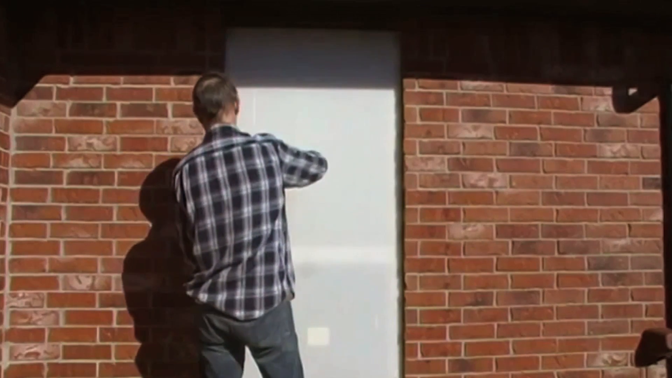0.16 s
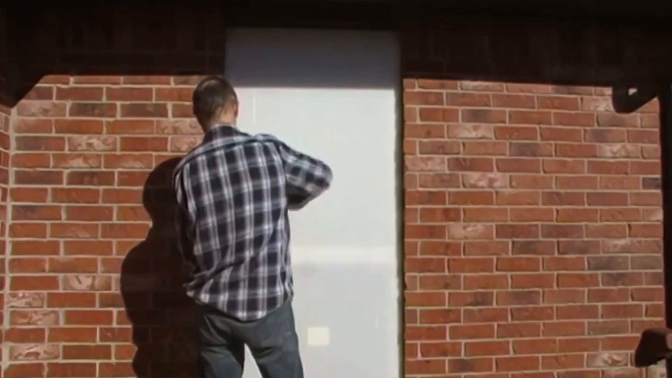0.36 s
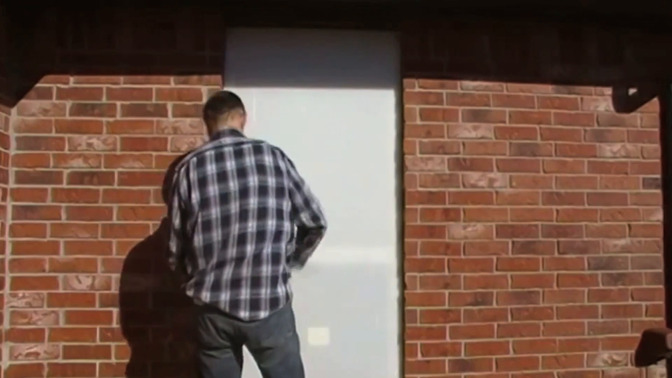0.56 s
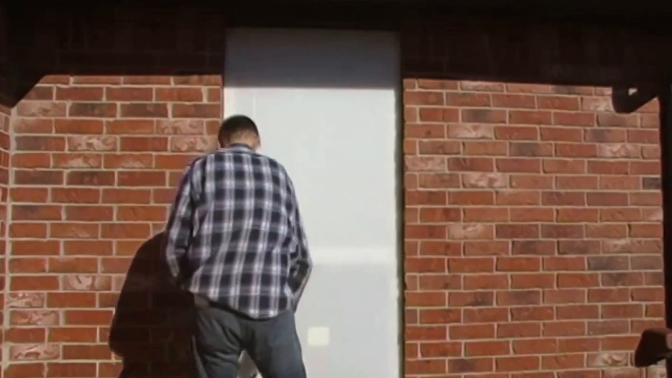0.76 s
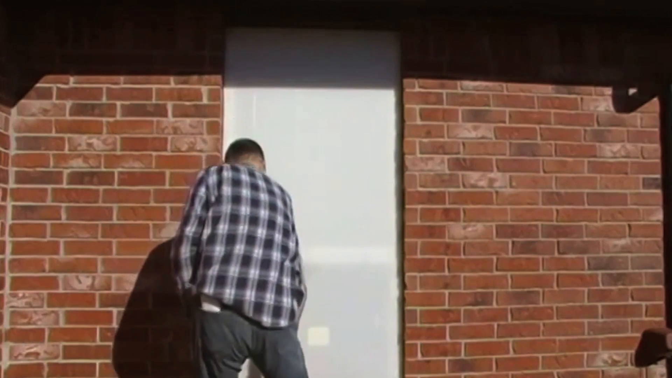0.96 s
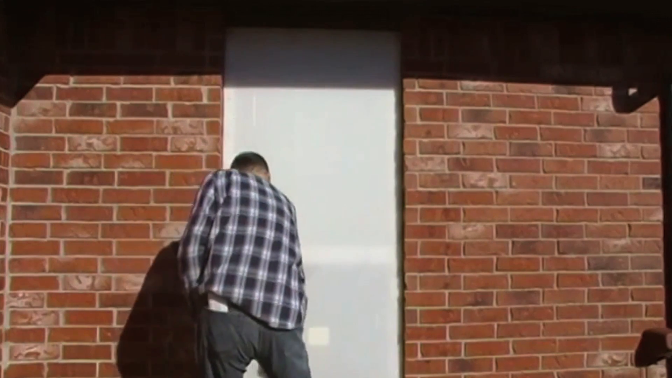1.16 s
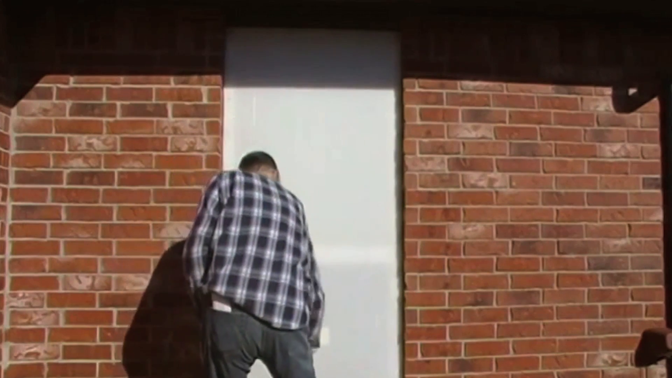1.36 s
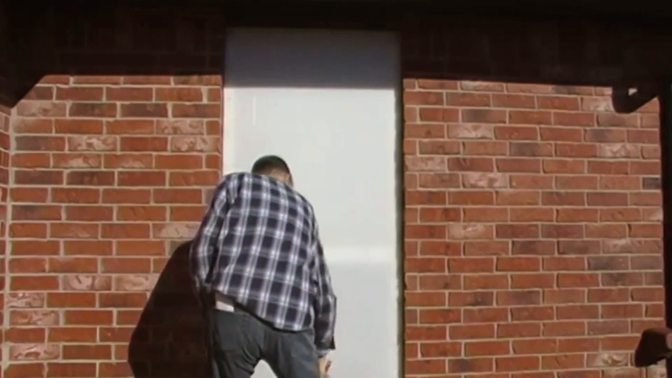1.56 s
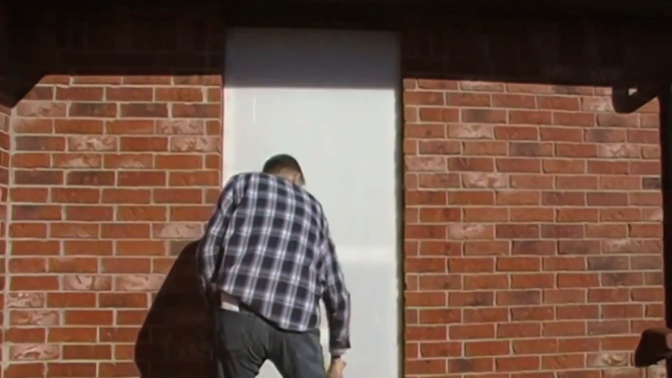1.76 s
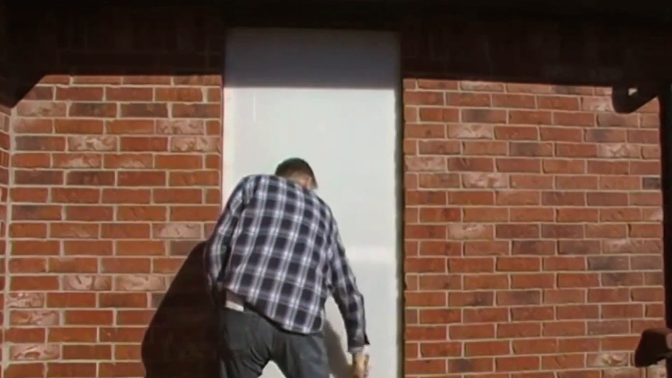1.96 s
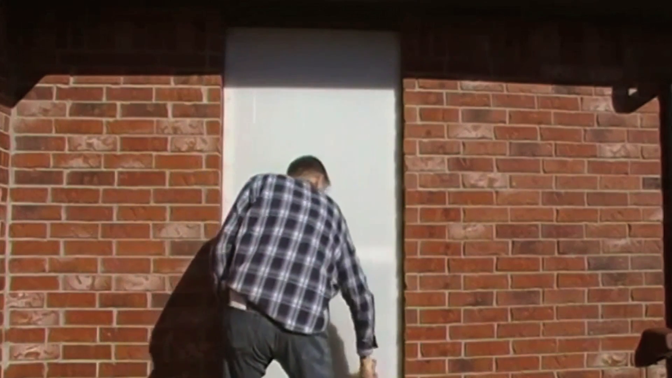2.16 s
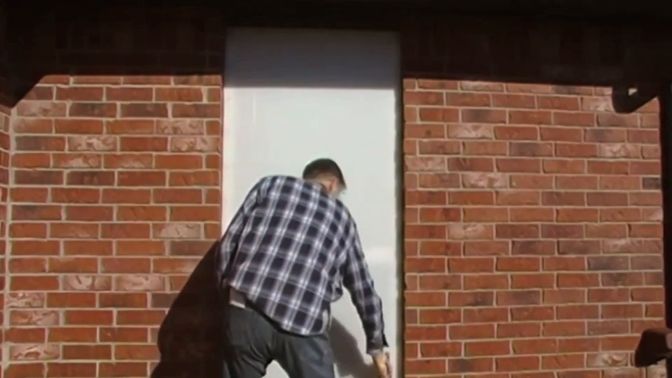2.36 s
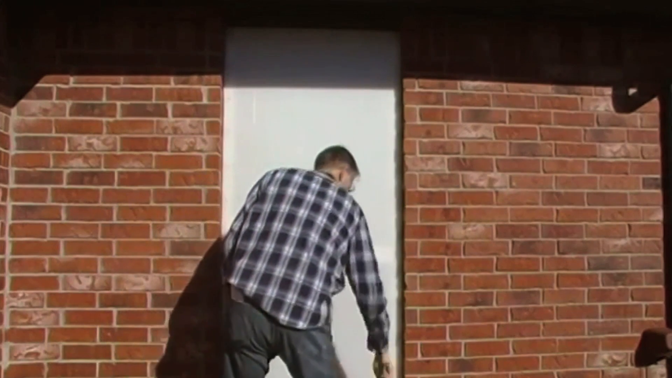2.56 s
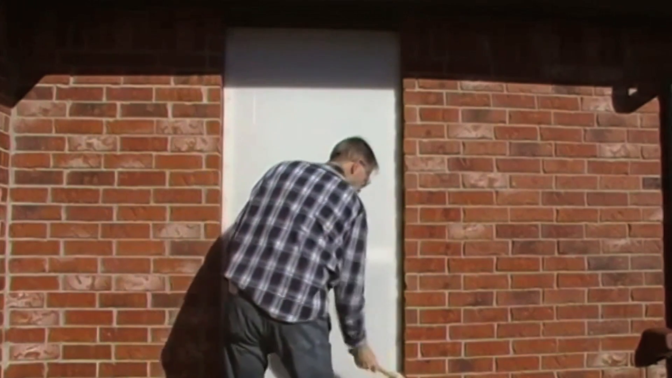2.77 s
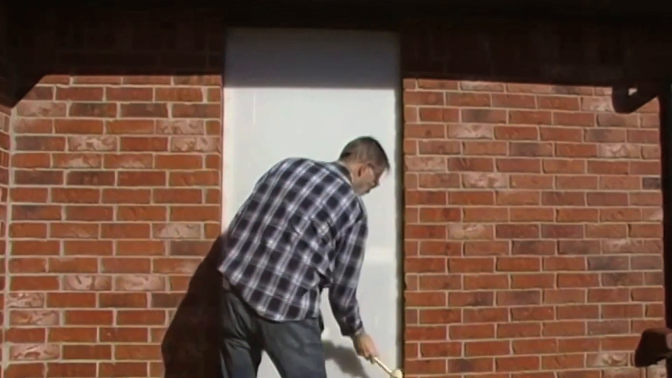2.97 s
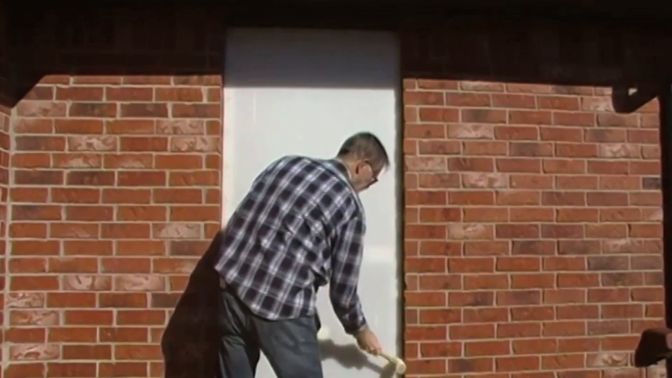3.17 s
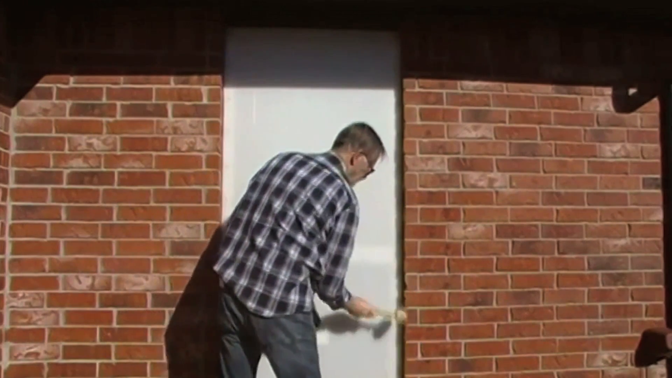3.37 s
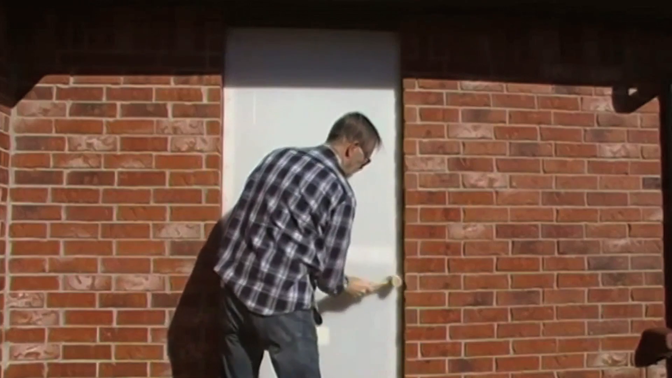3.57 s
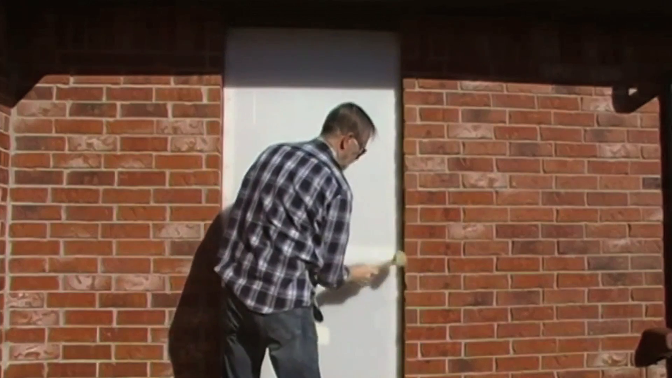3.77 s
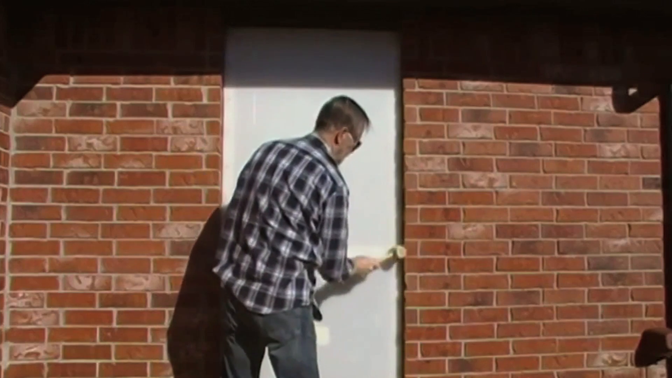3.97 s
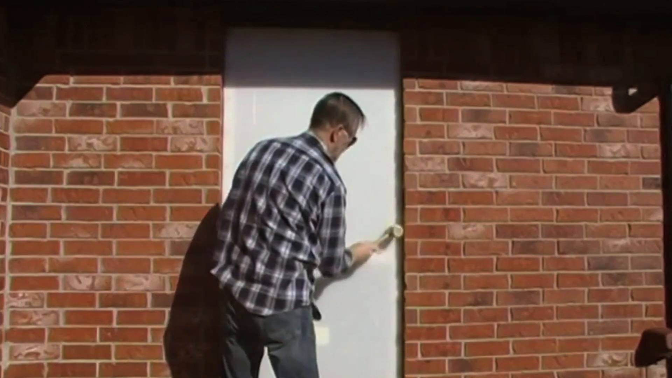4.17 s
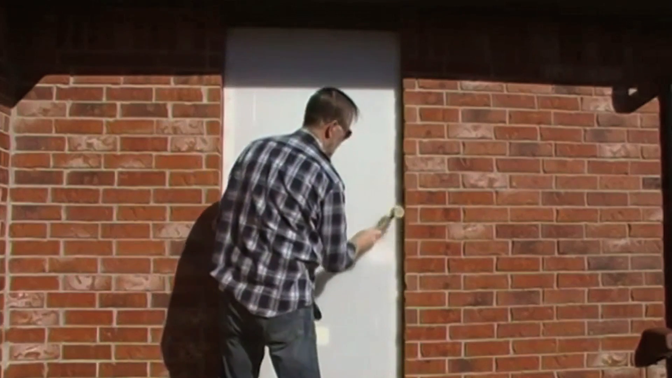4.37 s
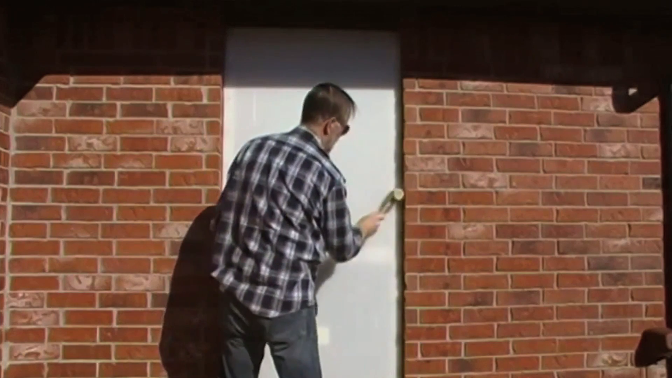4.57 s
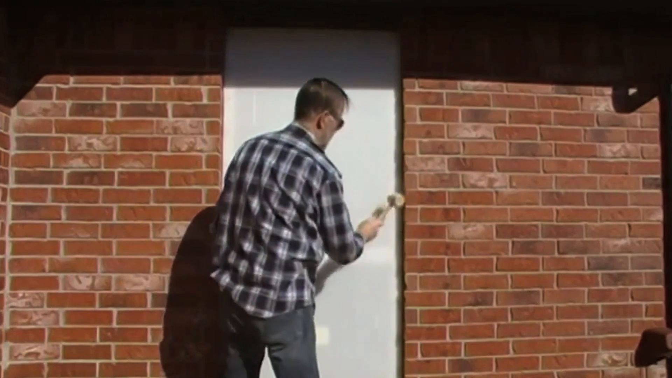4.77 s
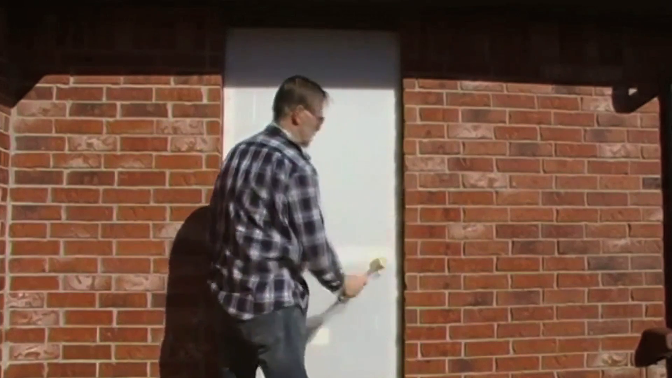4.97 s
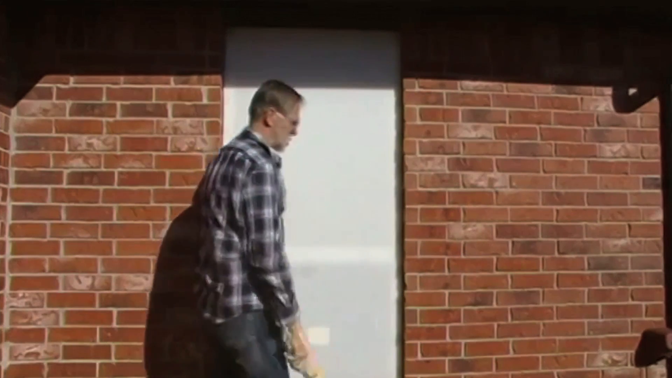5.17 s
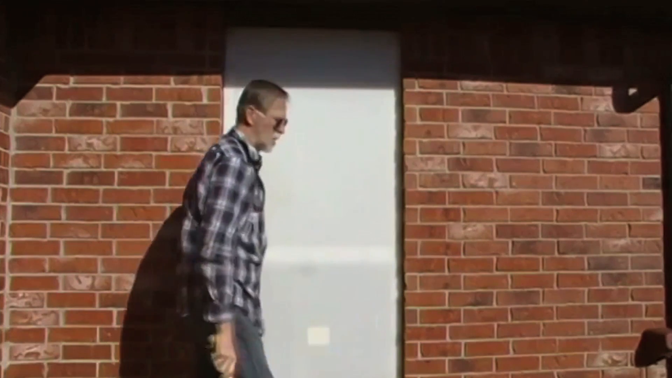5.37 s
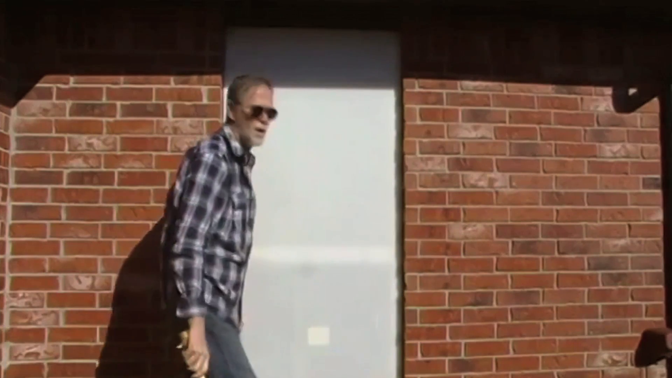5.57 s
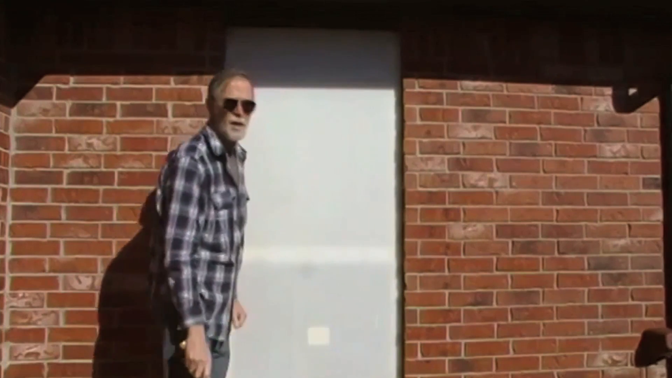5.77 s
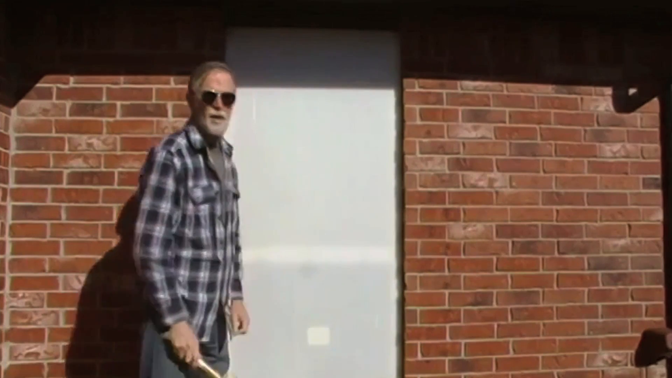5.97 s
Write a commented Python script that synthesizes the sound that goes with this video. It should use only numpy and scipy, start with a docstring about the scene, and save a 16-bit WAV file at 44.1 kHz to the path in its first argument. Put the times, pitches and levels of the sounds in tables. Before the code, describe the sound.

Loud mallet blows knock a light sheet panel into its frame outdoors, each booming, rattling and distorting, with faint cloth rustle after the last hits.

```python
"""Window panel tapped into its frame

A mallet taps a light storm window panel into its frame, working along the edge.
Each blow knocks the edge (swinging tone, noise band), sets the sheet booming (decaying modes, noise bands)
and makes it chatter in the frame (gated noise), overloading the microphone (hard clipping).
Between the blows: small frame ticks, rustling clothes, low outdoor rumble, faint far tones, hiss and whine."""
import sys
import numpy as np
from scipy import signal
from scipy.fft import rfft, irfft, next_fast_len
from scipy.io import wavfile

SR = 44100
rng = np.random.default_rng(int(sys.argv[2]) if len(sys.argv) > 2 else 0)


def unload_audio(sound):
    """Save the sound as a 16-bit wav file, at the path given as the first command line argument."""
    columns = np.transpose(np.atleast_2d(sound))
    # keep every value between -1 and 1, then stretch to whole-number steps
    steps = np.round(np.clip(columns, -1, 1) * 32767)
    wavfile.write(sys.argv[1], SR, steps.astype(np.int16))


N = 266034
TIME_S = np.arange(N) / SR
AGE_S = np.arange(int(.72 * SR)) / SR  # time since the onset of one sound
BAND_HZ = 30 * 2 ** (np.arange(18) / 2)  # half-octave steps

# mallet blows: (time [s], force [dB], height up the edge [m], knock pitch [Hz], then relative to the force:
# knock [dB], second knock [dB], crack [dB], rattle [dB], slap [dB])
BLOWS = [(-.115, -1, 1.3, 845, 8, -11, -9, -17, -10.5), (0.2642, -0.5, 0.95, 382, -1, -0.5, -2, -14.5, -23),
         (1.2834, 1, .25, 303.8, 7, 2, -22, -22, -12), (1.6668, -2.5, .15, 312, 3.5, 3, -4, -38, -20.5),
         (2.0646, -1.5, 0.16, 272.6, 2.5, -7, -3.5, -38, -17.5),
         (2.427, -26.5, .2, 236.4, 21, -5, -10.5, -28, -27),
         (2.4809, -2, 0.22, 237.3, 7.5, -6.5, -5.5, -26.5, -18),
         (3.216, 0.5, .36, 222.5, 1, -22, 2.5, -14, -12),
         (3.6804, -1.5, 0.78, 509, -0.5, -13, 0.5, -9.5, -41),
         (4.017, -1.5, 0.86, 769, 2.5, -5, -4.5, -8, -11.5), (4.3652, -1.5, 1.0, 706, -3, 1, 1, -8.5, -25),
         (4.7012, -2.5, 1.32, 785.5, 6.5, 6.5, -3.5, -8.5, -15)]
# two strong low drum modes of the panel, their levels varying with height and by blow:
# (frequency [Hz], relative level [dB], t60 [s])
DRUM_MODES = [(80.97, -2, 0.55), (163.7, -4.5, 0.52)]
# other panel modes, some short and some long: (frequency [Hz], relative level [dB], t60 [s])
PANEL_MODES = [(67, -2, 0.42), (96.8, -8.5, 0.66), (127.5, -3.5, 0.44), (204, -2, 0.5), (239.8, 1, 0.4),
               (273, 0, 0.24), (336.4, 1.5, 0.47), (398.7, -8, 0.56), (429, -9.5, 0.46), (504, -16, 0.64),
               (526, 1, 0.25), (610, -1, 0.27), (790, -6, 0.34), (897, -9, 0.38), (989, -17.5, 0.5),
               (1087, -6.5, 0.34), (1173, -10, 0.43), (1230, -33, 0.92), (1570, -34, 0.23),
               (1680, -12, 0.17), (1837, -23, 0.7), (2120, -11, 0.22), (3230, -33, 0.87), (4130, -31, 0.14)]
# crowded bending waves of the sheet: (frequency [Hz], relative level before tilt [dB per octave band], t60 [s])
SHEET_BANDS = [(30, -21.5, 0.81), (70.5, -20, 0.15), (138, -10.5, 0.43), (250, -8.5, 0.45), (520, -1, 0.32),
               (1040, -5.5, 0.3), (2030, -13.5, 0.41), (3830, -18, 0.36), (5370, -21, 0.31),
               (10100, -24.5, 0.22)]
# hard contact of panel and frame: (frequency [Hz], relative level [dB per octave band])
CONTACT_SPECTRUM = [(300, -19), (900, 1.5), (2000, -4.5), (4000, -1.5), (6000, -12.5), (10500, -10.5)]
# small ticks of the frame: (time [s], level [dB], centre [Hz], t60 [s])
FRAME_TICKS = [(1.504, -32, 2200, 0.032), (1.506, -26.5, 2000, 0.03), (2.835, -36, 3880, .042),
               (5.379, -35, 1360, 0.087), (5.405, -40, 1210, 0.46)]
# arm and body movements: (middle [s], half-width to -17 dB [s], relative level [dB])
MOVES = [(.22, 0.34, -51), (0.533, 0.11, -47), (5.017, 0.4, -47.5), (5.333, 0.23, -55.5),
         (5.593, 0.19, -47), (6.03, 0.14, -48)]
# sliding cloth: (frequency [Hz], relative level [dB per octave band])
CLOTH_SPECTRUM = [(500, -10.5), (1500, -8.5), (4000, -4.5), (7000, -7), (11000, -2.5)]
# low outdoor rumble: (frequency [Hz], level [dB per octave band])
RUMBLE_SPECTRUM = [(25, -59), (55, -44.5), (105, -40.5), (180, -47.5), (350, -55.5), (1000, -70)]
# distant hum and hiss of the neighbourhood: (frequency [Hz], level before AIR_DB [dB per octave band])
AIR_SPECTRUM = [(200, -60.5), (350, -52.5), (700, -56.5), (1500, -61), (4000, -66.5), (10500, -73)]
# faint tones from far away: (start [s], length [s], mid-tone pitch [Hz], peak level [dB])
FAR_TONES = [(0.731, 0.073, 1565, -57), (0.729, 0.12, 1800, -56), (0.785, 0.057, 880, -49.5),
             (1.15, 0.29, 793, -47.5), (1.18, 0.075, 1630, -56), (3.03, 0.14, 790, -48.5)]
# microphone hiss: (frequency [Hz], level [dB per octave band])
HISS_SPECTRUM = [(500, -71), (2000, -66), (5000, -62), (10500, -62)]
# thin electrical whine: (frequency [Hz], level [dB])
WHINE = (7900, -73)

# edge and sheet, relative to the force
SWING_DB, SHEET_DB = 0.5, -2
SHEET_TILT_DB_PER_OCTAVE, TILT_PER_FORCE_DB = 0.69, 0.27
# the second knock lies this share of the way, in octaves, to the pitch that the sheet favours
FAVOURED_HZ, FAVOURED_SHARE = 589, .62
# higher up the edge the panel is looser: stronger drum modes, lower rattle, later slap
BOOM_DB, BOOM_DB_PER_M = -11.5, -0.5
DRUM_DB, DRUM_DB_PER_M, DRUM_SCATTER_DB = np.array([-1.5, -0.5]), 4, 3.55
RATTLE_HZ, RATTLE_OCTAVES_PER_M, RATTLE_OCTAVES, RATTLE_TOP_HZ = 3850, -1.51, 1.2, 5000
SLAP_S, SLAP_S_PER_M = .026, .007
# one slow sway of the panel; its ticking weakens with height
SWAY_S, CHATTER_DB_PER_M = .04, -2
AIR_DB = 1
MIC_TOP_HZ, TOP_HZ = 11400, 16200


def undb(db):
    """Decibels to gain."""
    return 10 ** (np.asarray(db) / 20)


def fade(t60_s):
    """Free exponential decay, 60 dB in t60_s."""
    return np.exp(-np.log(1000) * AGE_S / t60_s)


def swell_in(build_s):
    """Exponential build-up."""
    return 1 - np.exp(-AGE_S / build_s)


def at_hz(table, hz):
    """Columns of a spectrum table, interpolated over log frequency."""
    table_hz, *columns = np.transpose(table)
    return [np.interp(np.log(hz), np.log(table_hz), column) for column in columns]


def add(out, start_s, sound):
    """Mix a sound in at start_s, cut to the length of the scene."""
    start = int(round(start_s * SR))
    a, b = max(start, 0), min(start + sound.shape[-1], N)
    out[:, a:b] += sound[..., a - start:b - start]


def walk(rate_hz):
    """Slow random curve: normal knots joined by straight lines."""
    knots = rng.standard_normal(int(N / SR * rate_hz) + 2)
    return np.interp(TIME_S * rate_hz, np.arange(len(knots)), knots)


def noise(hz, octaves, size, apart_hz=3500, widest=0.96):
    """Stereo noise band of rms 1; short waves differ more between the channels."""
    n = next_fast_len(size, real=True)
    f = np.arange(1, n // 2) * SR / n
    shape = np.exp(-2 * (np.log2(f / hz) / octaves) ** 2)
    phase = 2 * np.pi * rng.random((2, len(f)), dtype=np.float32)
    spectrum = np.zeros((2, n // 2 + 1), np.complex64)
    spectrum[:, 1:n // 2] = shape * (np.cos(phase) + 1j * np.sin(phase))
    mid, side = irfft(spectrum, n)[:, :size]
    side = side * min(hz / apart_hz, widest)
    pair = np.array([mid + side, mid - side])
    return pair / pair.std()


def coloured(table, size, apart_hz=3200, widest=0.9):
    """Stereo noise; the table sets the octave-band levels of its mid signal."""
    n = next_fast_len(size, real=True)
    f = np.maximum(np.fft.rfftfreq(n, 1 / SR), 1)
    low_cut = np.minimum(f / table[0][0], 1) ** 2
    per_octave = np.sqrt(SR / (2 * np.log(2) * f))  # white noise to equal power per octave
    gain = undb(at_hz(table, f)[0]) * low_cut * per_octave
    mid, side = rfft(rng.standard_normal((2, n))) * gain
    side = side * np.minimum(f / apart_hz, widest)
    return irfft(np.array([mid + side, mid - side]), n)[:, :size]


def mallet():
    """Every blow, then the slap of the returning panel and the echo; all scale with the force."""
    out = np.zeros((2, N))
    for s, force_db, height_m, *contact, slap_db in BLOWS:
        force = undb(force_db)
        add(out, s, force * blow(force_db, height_m, *contact))
        after = undb(slap_db) * slap() + yard()
        add(out, s + SLAP_S + SLAP_S_PER_M * height_m, force * after)
    return out


def blow(force_db, height_m, hz, knock_db, second_db, crack_db, rattle_db):
    """Panel's answer to one blow: the edge swings and knocks, the sheet cracks, rattles, booms and chatters."""
    second_hz = hz * (FAVOURED_HZ / hz) ** FAVOURED_SHARE
    edge = undb(SWING_DB) * swing(hz) + undb(knock_db) * knock(hz) + undb(second_db) * knock(second_hz)
    waves = undb(SHEET_DB) * sheet(SHEET_TILT_DB_PER_OCTAVE + TILT_PER_FORCE_DB * force_db)
    rattle_hz = RATTLE_HZ * 2 ** (RATTLE_OCTAVES_PER_M * height_m)
    buzz = undb(rattle_db) * rattle(rattle_hz, RATTLE_OCTAVES)
    short_waves = clustered(undb(crack_db) * crack() + waves + buzz)
    drum_db = DRUM_DB + DRUM_DB_PER_M * height_m + DRUM_SCATTER_DB * rng.standard_normal(2)
    body = undb(BOOM_DB + BOOM_DB_PER_M * height_m) * boom(drum_db)
    return edge + short_waves + body + undb(CHATTER_DB_PER_M * height_m) * chatter()


def swing(hz, direct_db=10, direct_t60_s=0.023):
    """The edge gives way under the mallet and swings for a few cycles."""
    return -undb(direct_db) * np.sin(2 * np.pi * hz * AGE_S) * fade(direct_t60_s)


def knock(hz, return_db=-9, return_t60_s=0.3, octaves=0.49, tone_db=-11.5, tone_t60_s=0.32, build_s=0.0055):
    """Waves come back from the frame and gather round a pitch set by the place struck."""
    crowd = undb(return_db) * noise(hz, octaves, len(AGE_S)) * fade(return_t60_s)
    tone = undb(tone_db) * np.sin(2 * np.pi * (hz * AGE_S + rng.random())) * fade(tone_t60_s)
    return (crowd + tone) * swell_in(build_s)


def crack(rise_s=0.0029, crack_t60_s=0.022, crack_db=13, grain_db=4, grain_s=0.001056):
    """The mallet drives the edge hard against the frame: a burst with a randomly grainy level."""
    knots = rng.standard_normal(2000)
    grain = undb(grain_db * np.interp(AGE_S / grain_s, np.arange(len(knots)), knots))
    grain = grain / np.sqrt(np.mean(grain ** 2))
    envelope = swell_in(rise_s) ** 2 * fade(crack_t60_s) * grain
    return undb(crack_db) * envelope * coloured(CONTACT_SPECTRUM, len(AGE_S), apart_hz=4000, widest=0.35)


def sheet(tilt_db, spread_s=0.0092, pivot_hz=500):
    """Crowded bending modes; long waves travel slowly, so the bass builds up later."""
    out = 0
    for hz in BAND_HZ:
        db, t60_s = at_hz(SHEET_BANDS, hz)
        gain = undb(db + tilt_db * np.log2(hz / pivot_hz))
        build = swell_in(spread_s * (pivot_hz / hz) ** .7)
        out = out + gain * build * fade(t60_s) * noise(hz, 0.7, len(AGE_S))
    return out / np.sqrt(2)  # two bands per octave


def rattle(hz, octaves, t60_s=0.5, steady=0.59, touch_s=0.003, scatter_db=3, uneven=0.31):
    """The loose edge touches the frame about once per swing of the first drum mode."""
    gaps, sizes = rng.standard_normal((2, 60))
    times_s = np.cumsum(np.exp(uneven * gaps)) / DRUM_MODES[0][0]
    touches = np.zeros(len(AGE_S))
    for s, size in zip(times_s, undb(scatter_db * sizes)):
        after = touches[int(s * SR):][:SR // 30]  # a view: adding to it fills touches
        after += size * np.exp(-AGE_S[:len(after)] / touch_s)
    buzz = (steady + touches) * fade(t60_s) * noise(hz, octaves, len(AGE_S))
    return signal.sosfilt(signal.butter(8, RATTLE_TOP_HZ, fs=SR, output="sos"), buzz)


def clustered(sound, patchy_db=3.5, cluster_hz=90, above_hz=700):
    """Each blow favours some clusters of short bending waves: random gain over frequency."""
    n = next_fast_len(len(AGE_S) + SR // 10, real=True)
    f = np.fft.rfftfreq(n, 1 / SR)
    knots = rng.standard_normal(600)
    patches = np.interp(f / cluster_hz, np.arange(len(knots)), knots)
    gain = undb(patchy_db * np.minimum(f / above_hz, 1) * patches)
    gain = gain / np.sqrt(np.mean(gain ** 2))
    return irfft(rfft(sound, n) * gain, n)[:, :len(AGE_S)]


def boom(drum_db):
    """The panel's own modes; drum_db sets how much the two drum modes get."""
    drum = sum(undb(db) * mode(*row) for db, row in zip(drum_db, DRUM_MODES))
    return drum + sum(mode(*row) for row in PANEL_MODES)


def mode(hz, db, t60_s, scatter_db=2.4, detune=0.00365, build_cycles=1.9):
    """One panel mode; it builds up over its first cycles, a little differently each time."""
    pitch, level, phase = rng.standard_normal(3)
    wave = np.sin(2 * np.pi * (hz * (1 + detune * pitch) * AGE_S + phase))
    return undb(db + scatter_db * level) * wave * fade(t60_s) * swell_in(build_cycles / hz)


def chatter(chatter_db=-25, chatter_hz=4300, octaves=0.3, tick_s=0.0067, chatter_t60_s=0.59):
    """The swaying panel ticks against the frame, more faintly each time."""
    touches = np.exp(-(AGE_S % SWAY_S) / tick_s) * (AGE_S > SWAY_S)
    return undb(chatter_db) * touches * fade(chatter_t60_s) * noise(chatter_hz, octaves, len(AGE_S))


def slap(slap_db=-3, slap_t60_s=0.12, wash_db=-10, wash_t60_s=0.39):
    """The panel swings back against the frame, with a crunchy wash after it."""
    envelope = fade(slap_t60_s) + undb(wash_db) * fade(wash_t60_s)
    return undb(slap_db) * envelope * coloured(CONTACT_SPECTRUM, len(AGE_S))


def yard(yard_db=-40, yard_hz=1200, octaves=1.75, yard_t60_s=1.38, arrive_s=0.035):
    """Walls and trees further off return a faint wash after each blow."""
    return undb(yard_db) * swell_in(arrive_s) * fade(yard_t60_s) * noise(yard_hz, octaves, len(AGE_S))


def ticks(octaves=1.95):
    """The frame settles with small ticks: decaying noise bands."""
    out = np.zeros((2, N))
    for s, db, hz, t60_s in FRAME_TICKS:
        add(out, s, undb(db) * fade(t60_s) * noise(hz, octaves, len(AGE_S)))
    return out


def clothes(flutter_db=2):
    """Cloth slides as arm and body move; each movement swells and dies away."""
    speed = sum(undb(db) * np.exp(-2 * ((TIME_S - s) / width_s) ** 2) for s, width_s, db in MOVES)
    return speed * undb(flutter_db * walk(25)) * coloured(CLOTH_SPECTRUM, N)


def outdoors(swell_db=0.5):
    """Steady rumble and distant noise that swells gently."""
    air = undb(AIR_DB + swell_db * walk(3.1)) * coloured(AIR_SPECTRUM, N)
    return coloured(RUMBLE_SPECTRUM, N) + air


def far_tones(sag=0.017):
    """Short distant tones that swell, sag in pitch and fade."""
    out = np.zeros((2, N))
    for s, length_s, hz, db in FAR_TONES:
        progress = np.linspace(0, 1, int(length_s * SR))
        cycles = np.cumsum(hz * (1 + sag * (.5 - progress))) / SR
        add(out, s, undb(db) * np.sin(np.pi * progress) * np.sin(2 * np.pi * cycles))
    return out


def hiss_and_whine():
    """The microphone's hiss and a thin electrical whine, both steady."""
    hz, db = WHINE
    return coloured(HISS_SPECTRUM, N) + undb(db) * np.sin(2 * np.pi * hz * TIME_S)


def scene():
    """The work at the window over its quiet background."""
    return mallet() + ticks() + clothes() + outdoors() + far_tones() + hiss_and_whine()


def record(dry, drive_db=0):
    """The microphone passes little treble; peaks clip flat at full scale, then a last low-pass."""
    heard = signal.sosfilt(signal.ellip(8, .3, 60, MIC_TOP_HZ, fs=SR, output="sos"), dry)
    clipped = np.clip(undb(drive_db) * heard, -1, 1)
    return signal.sosfilt(signal.ellip(8, .1, 70, TOP_HZ, fs=SR, output="sos"), clipped)


dry = scene()
out = record(dry)
unload_audio(out)
```